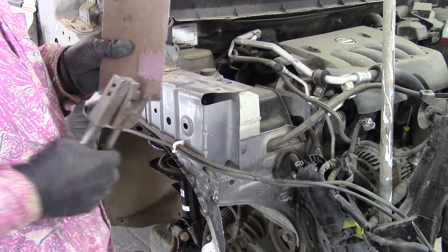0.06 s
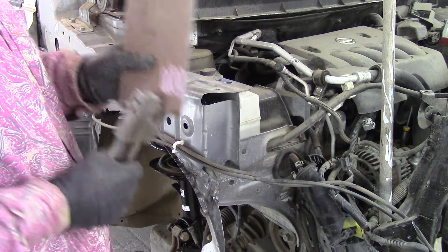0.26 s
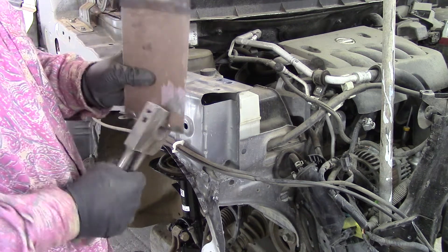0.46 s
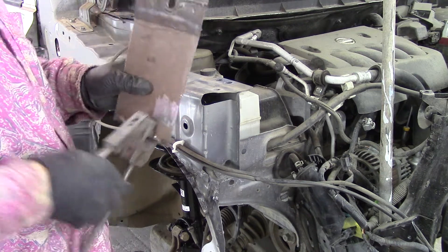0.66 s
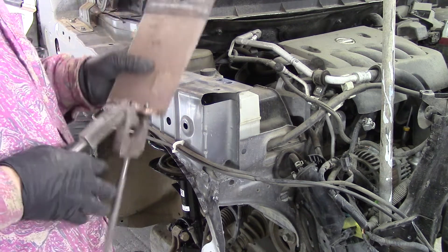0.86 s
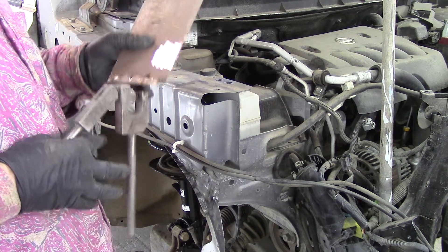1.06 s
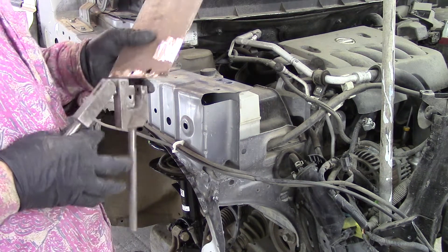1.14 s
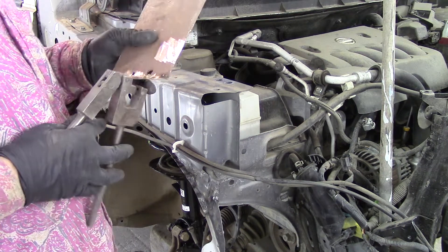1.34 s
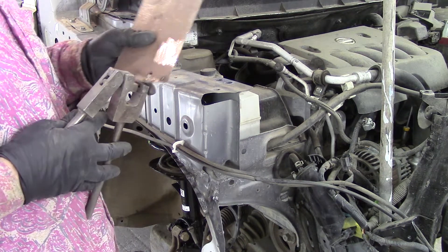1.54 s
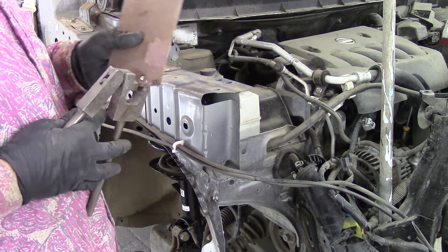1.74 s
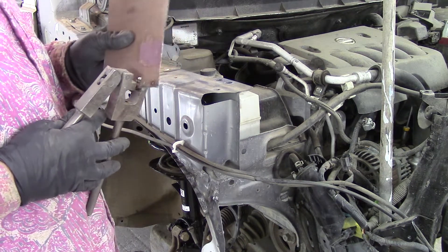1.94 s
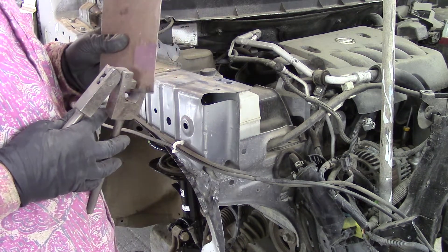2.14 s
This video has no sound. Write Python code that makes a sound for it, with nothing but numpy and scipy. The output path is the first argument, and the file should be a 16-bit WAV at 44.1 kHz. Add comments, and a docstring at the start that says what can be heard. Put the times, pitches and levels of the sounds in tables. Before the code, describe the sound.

Close up in a garage, a metal punch clicks, cracks sharply through a steel sheet and clanks as its levers shut. A lighter clatter follows as it pulls out, then a few faint clacks with a slight echo.

```python
"""Hand-lever punch through sheet steel

In a garage, the punch seats with a click, the steel shears with a bright crack, and the levers slam
on their stop. The punch pulls free and slides off the sheet; the loose tool clacks a few times.
Each blow rings the jaws and handles and echoes in the room, over quiet air and a distant motor."""
import sys
import numpy as np
from scipy import signal
from scipy.io import wavfile
from scipy.ndimage import uniform_filter1d

SR = 44100
rng = np.random.default_rng(int(sys.argv[2]) if len(sys.argv) > 2 else 0)


def int16_out(signal):
    """Quantize to a 16-bit WAV file."""
    q = np.round(np.clip(np.atleast_2d(signal).T, -1, 1) * 32767)
    wavfile.write(sys.argv[1], SR, q.astype(np.int16))


N = 97020
TIME_S = np.arange(N) / SR
EDGES_HZ = np.geomspace(22, 17500, 25)
CENTRES_HZ = np.sqrt(EDGES_HZ[1:] * EDGES_HZ[:-1])
BANK = [signal.butter(2, pair, "band", fs=SR, output="sos") for pair in zip(EDGES_HZ, EDGES_HZ[1:])]


def from_db(db):
    """Decibels to gain."""
    return 10 ** (np.asarray(db) / 20)


def unit_rms(x):
    """Scale to rms 1."""
    return x / np.sqrt(np.mean(x ** 2) + 1e-20)


def at_hz(points, hz):
    """Interpolate a table on a log-frequency axis."""
    freq_hz, value = np.transpose(points)
    return np.interp(np.log(hz), np.log(freq_hz), value)


def decay(t, t60_s):
    """Exponential fall, 60 dB in t60_s."""
    return np.exp(-np.log(1000) * t / np.maximum(t60_s, 1e-3))


def add(out, start_s, x):
    """Mix x in at start_s."""
    i = int(start_s * SR)
    out[i:i + len(x)] += x[:N - i]


def bandpass(x, edges_hz):
    """Second-order band-pass."""
    sos = signal.butter(2, np.clip(edges_hz, 15, .45 * SR), "band", fs=SR, output="sos")
    return signal.sosfilt(sos, x)


def noise_bands(size):
    """One row of noise per band, equal power per Hz."""
    run_in = SR // 10
    white = rng.standard_normal((2, size + run_in)) * np.sqrt(SR / 2000)
    return np.array([signal.sosfilt(sos, white[k % 2])[run_in:] for k, sos in enumerate(BANK)])


# Air spectrum: freq_hz, relative_density_db
AIR_SPECTRUM = [(25, -14), (50, -5.5), (100, -4.5), (150, -2.5), (300, -5), (420, -3.5), (620, -4),
                (800, -7), (1020, -3.5), (1400, -10), (1700, -14), (4000, -18.5), (6500, -22),
                (9300, -25.5), (15500, -25.5)]
# Air stereo width: freq_hz, side_gain_db
AIR_WIDTH = [(30, -5.5), (150, -7.5), (800, -6), (4000, -8.5), (14000, -17.5)]
# Motor partials: pitch_hz, level_db
MOTOR_HUM = [(150.7, -71.5), (301.5, -73.5), (598.5, -67)]

def air_and_motor(air_db=-57.5):
    """Steady air noise and a distant motor's hum; returns mid, side."""
    gain = from_db(at_hz(AIR_SPECTRUM, CENTRES_HZ))
    mid = gain @ noise_bands(N)
    side = (gain * from_db(at_hz(AIR_WIDTH, CENTRES_HZ))) @ noise_bands(N)
    scale = from_db(air_db) / np.std(mid)
    hum = sum(np.sqrt(2) * from_db(db) * np.sin(2 * np.pi * (hz * TIME_S + rng.random()))
              for hz, db in MOTOR_HUM)
    return scale * mid + hum, scale * side


# Reverb decay: freq_hz, t60_s
ROOM_DECAY = [(150, 0.34), (400, 0.71), (1000, 0.57), (2800, 0.59), (7000, 0.49), (14000, .33)]
# Reverb colour: freq_hz, gain_db
ROOM_SPECTRUM = [(100, -5), (300, -6), (1000, -1.5), (2500, -8.5), (7000, -6.5), (11000, -10), (15000, -12)]
# Panel and floor reflections: delay_s, gain_db
REFLECTIONS = [(.0057, -26), (.0095, -16), (.0169, -14.5), (.0225, -22), (.0315, -19)]

def garage(direct, send, build_s=.01, echo_highpass_hz=2500):
    """Diffuse tail plus hard echoes, treble only off small panels; returns mid, side."""
    t = TIME_S[:SR]
    onset = 1 - np.exp(-(t / build_s) ** 2)
    envelope = decay(t, at_hz(ROOM_DECAY, CENTRES_HZ)[:, None]) * onset
    colour = from_db(at_hz(ROOM_SPECTRUM, CENTRES_HZ))
    tails = []
    for _ in range(2):
        bands = noise_bands(SR) * envelope
        response = colour @ bands / np.sqrt(np.sum(bands ** 2))
        tails.append(signal.fftconvolve(send, response)[:N])
    mid, side = tails
    treble = signal.sosfilt(signal.butter(1, echo_highpass_hz, "high", fs=SR, output="sos"), direct)
    for delay_s, gain_db in REFLECTIONS:
        add(mid, delay_s, from_db(gain_db) * treble)
    return mid, side


# Metal sliding on metal: peak_s, half_length_s, level_db, centre_hz
RUBS = [(0.032, 0.099, -60, 7350), (0.06, 0.21, -59.5, 2220), (0.211, 0.037, -56.5, 2600),
        (0.211, 0.06, -59.5, 6940), (0.9, .005, -61, 2600), (1.10, 0.026, -62, 8820),
        (1.132, .016, -53.5, 9170), (1.147, 0.0026, -55, 2640), (1.277, 0.014, -65, 7400),
        (1.299, 0.0042, -58.5, 2200), (2.127, 0.013, -62, 8280)]

def friction(edge_ratio=1.4, grain_db=1.5):
    """Faint grainy swells as the tool shifts on the sheet."""
    out = np.zeros(N)
    for peak_s, half_length_s, level_db, centre_hz in RUBS:
        roughness = unit_rms(uniform_filter1d(rng.standard_normal(N), size=80))
        grains = from_db(grain_db * roughness) * rng.standard_normal(N)
        rub = bandpass(grains, [centre_hz / edge_ratio, centre_hz * edge_ratio])
        swell = np.exp(-((TIME_S - peak_s) / half_length_s) ** 2)
        out += from_db(level_db) * unit_rms(rub) * swell
    return out


# Handle bending modes: pitch_hz, gain_db, t60_s
HANDLE_MODES = [(529, -3.5, .08), (646.1, -3, .29), (658.6, -8, 0.18), (703, -6, 0.083)]

def handle_ring(attack_s=.012):
    """The long handles hum briefly when jarred."""
    pitch_hz, gain_db, t60_s = np.transpose(HANDLE_MODES)[:, :, None]
    t = TIME_S[:SR // 2]
    partials = from_db(gain_db) * decay(t, t60_s) * np.sin(2 * np.pi * pitch_hz * t)
    return partials.sum(axis=0) * (1 - decay(t, attack_s))


# Tool body peaks and dips: centre_hz, width_hz, gain_db
BODY_RESONANCES = [(405, 140, -4), (842.6, 150, -10), (1469, 93, -1), (1685, 33, 2.5), (2570, 170, 6.5),
                   (3100, 480, 5.5), (3960, 550, 4), (4174, 1600, -3.5), (6793, 130, -1.5),
                   (8968, 600, 3.5), (11427, 520, 5.5), (12400, 1800, -3)]

def steel_body(x, passband_hz=(200, 11000)):
    """The tool's broad resonances, one peaking filter each."""
    for centre_hz, width_hz, gain_db in BODY_RESONANCES:
        g = from_db(gain_db / 2)
        alpha = np.tan(np.pi * width_hz / SR)
        c = -2 * np.cos(2 * np.pi * centre_hz / SR)
        x = signal.lfilter([1 + alpha * g, c, 1 - alpha * g], [1 + alpha / g, c, 1 - alpha / g], x)
    return bandpass(x, passband_hz)


def ring_clusters(modes, drives_db, count, attack_s=.0037):
    """Struck steel: clusters of close, decaying sines that beat."""
    t = TIME_S[:SR // 2]
    out = np.zeros(len(t))
    for (pitch_hz, gain_db, t60_s, spread_hz), drive_db in zip(modes, drives_db):
        offsets_hz = spread_hz * (2 * (np.arange(count) + rng.random(count)) / count - 1)
        phase = 2 * np.pi * ((pitch_hz + offsets_hz)[:, None] * t + rng.random((count, 1)))
        envelope = decay(t, t60_s)
        cluster = unit_rms(np.sin(phase).sum(axis=0) * envelope)
        out += from_db(gain_db + drive_db) * cluster * np.sqrt(np.mean(envelope ** 2) / 2)
    return out * (1 - decay(t, attack_s))


# Bounds of the five zones of a blow's spectrum: edge_hz
ZONE_EDGES_HZ = [100, 350, 1000, 4000, 10000, 16000]
# Jaw modes, levers loose: pitch_hz, gain_db, t60_s, spread_hz
JAW_MODES = [(270, -7, 0.21, 13), (770, -8, 0.096, 24), (1170, -16, 0.14, 12), (1412.4, -14.5, 0.15, 15),
             (1670, -16, .18, 10), (1829, -20.5, 0.26, 10), (2216, -20, .26, 60), (2588, -11, 0.075, 55),
             (3096, -14, .07, 95), (3550, -16, 0.087, 12), (3954, -11, .06, 25), (5074, -8.5, 0.042, 26),
             (6423, -20, 0.18, 120), (7280, -14, 0.021, 88), (10370, -13.5, .06, 170)]

def steel_blow(zones_db, t60_s, jaw_db, scatter_db=3, bass_corner_hz=396):
    """Steel on steel: a clatter of dense, short modes, then the jaws' longer ring."""
    edges_hz = np.array(ZONE_EDGES_HZ)
    zones_hz = np.sqrt(edges_hz[1:] * edges_hz[:-1])
    per_khz_db = np.array(zones_db) - 10 * np.log10(np.diff(edges_hz) / 1000)
    gain = from_db(at_hz(np.c_[zones_hz, per_khz_db], CENTRES_HZ))
    band_t60_s = t60_s * (1 + 1 / (1 + (CENTRES_HZ / bass_corner_hz) ** 2))   # bass rings longer
    size = SR // 6
    envelope = decay(TIME_S[:size], band_t60_s[:, None])
    bursts = noise_bands(size) * envelope
    band_energy = np.diff(EDGES_HZ) / 1000 * np.sum(envelope ** 2, axis=1)
    clatter = (gain * np.sqrt(band_energy / np.sum(bursts ** 2, axis=1))) @ bursts
    drives_db = at_hz(np.c_[zones_hz, zones_db], np.array(JAW_MODES)[:, 0]) + jaw_db
    drives_db -= scatter_db * rng.standard_normal(len(JAW_MODES))
    out = ring_clusters(JAW_MODES, drives_db, count=6)
    out[:size] += steel_body(clatter)
    return out


# Modes of the strained sheet and jaws: pitch_hz, level_db, t60_s, spread_hz
SHEET_MODES = [(285, -41, 0.23, 8.3), (797, -26.5, 0.19, 5), (1151, -28, .2, 120), (1454, -25.5, .09, 80),
               (1877, -21, 0.29, 180), (2850, -25.5, 0.062, 450), (5050, -19, .2, 440),
               (5910, -25, 0.38, 400), (7050, -18.5, .22, 340), (8340, -15, .2, 330),
               (9200, -25, 0.25, 300), (10700, -25, 0.17, 450)]

def shear(jolt_s=.2775, jolt_db=-26, jolt_t60_s=.029, jolt_band_hz=(140, 350), ring_s=.279):
    """Sudden release of strain: a low jolt, then the bright ring of sheet and jaws."""
    out = np.zeros(N)
    envelope = decay(TIME_S[:SR // 2], jolt_t60_s)
    jolt = bandpass(rng.standard_normal(len(envelope)) * envelope, jolt_band_hz)
    add(out, jolt_s, from_db(jolt_db) * unit_rms(jolt) * np.sqrt(np.mean(envelope ** 2)))
    add(out, ring_s, ring_clusters(SHEET_MODES, np.zeros(len(SHEET_MODES)), count=22))
    return out


# Steel contacts (seat 0.24 s, shear 0.28 s, lever stop 0.37 s, pull free 0.65 s, then loose clacks):
# start_s, bass_db, low_mid_db, mid_db, treble_db, top_db, clatter_t60_s, jaw_db, handle_db, send_db
BLOWS = [ (.2424, -41, -33.5, -23, -16, -14.5, 0.024, -2, -63, -8.5),
         (.2771, -33, -41.5, -5, -36, -53, 0.022, -4, -63, -5),
         (.2790, -39, -18, -15, 0, -3, 0.013, -7, -57, 2),
         (.3659, -23.5, -27, -3, -12, -4, 0.024, -1, -19, -3),
         (.3826, -41.5, -21, -17, -15, -23.5, 0.091, -6, -18.5, -2),
         (0.617, -46, -52, -44, -34.5, -37, 0.035, -8, -72, -10.5),
         (0.6269, -48.5, -42.5, -37, -27.5, -29, 0.018, 2.5, -73, -6),
         (0.6521, -54, -28.5, -25.5, -20, -21.5, 0.051, -1, -53, -6),
         (.6790, -48.5, -33.5, -35, -45, -46.5, 0.055, 5, -42, -18),
         (1.5444, -48, -45, -33.5, -32, -42, .040, 2.5, -40.5, -12),
         (1.5751, -57, -46, -40, -45, -43, 0.049, -2.5, -60.5, -7.5),
         (1.581, -76, -24, -28, -36, -32, 0.024, -6, -33, -1.5),
         (1.586, -75, -37.5, -32, -27.5, -35, 0.026, -1, -66, -13),
         (1.6699, -57, -42, -38, -48, -60, 0.063, -6, -41, -16),
         (1.6830, -65, -49, -45, -52, -60, 0.065, -4, -61, -24),
         (1.7580, -53.5, -45, -58.5, -56, -63, 0.046, 0, -47.5, -10.5),
         (1.941, -65, -61, -58, -61.5, -66, 0.057, -0.5, -86, -6.5),
         (2.0665, -52, -34.5, -50.5, -47.5, -49, 0.043, 0.5, -33, -2),
         (2.085, -60, -40.5, -40, -52.5, -64.5, 0.069, -5, -70, -4)]

def punch(shear_send_db=-6, handle_send_db=-10.5):
    """The shear and every blow, each jarring the handles; returns direct sound, room send."""
    direct = shear()
    send = from_db(shear_send_db) * direct
    handle_tone = handle_ring()
    for start_s, *zones_db, clatter_t60_s, jaw_db, handle_db, send_db in BLOWS:
        blow = steel_blow(zones_db, clatter_t60_s, jaw_db)
        handles = from_db(handle_db) * handle_tone
        add(direct, start_s, blow + handles)
        add(send, start_s, from_db(send_db) * blow + from_db(handle_send_db) * handles)
    return direct, send


def scene(room_side_db=-22, air_pan_db=-1, treble_side_db=-19, treble_hz=(4800, 12000)):
    """Tool close and central; its treble scatters differently to left and right."""
    direct, send = punch()
    room, room_side = garage(direct, send)
    air, air_side = air_and_motor()
    mid = direct + friction() + room
    scatter = rng.standard_normal(SR // 50) * decay(TIME_S[:SR // 50], t60_s=.02)
    treble_side = signal.fftconvolve(bandpass(mid, treble_hz), scatter / np.linalg.norm(scatter))[:N]
    side = from_db(room_side_db) * room_side + air_side + from_db(treble_side_db) * treble_side
    left_right = np.array([[1], [-1]])
    return mid + air * from_db(left_right * air_pan_db / 2) + side * left_right


def record(dry, cutoff_hz=15900):
    """Clip at full scale, then a steep low-pass."""
    lowpass = signal.ellip(10, .2, 70, cutoff_hz, fs=SR, output="sos")
    return signal.sosfilt(lowpass, np.clip(dry, -1, 1))


dry = scene()
out = record(dry)
int16_out(out)
```